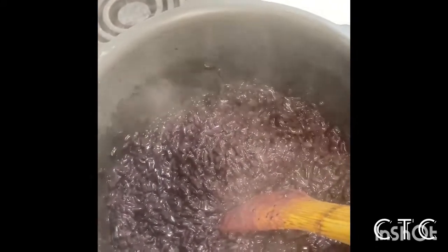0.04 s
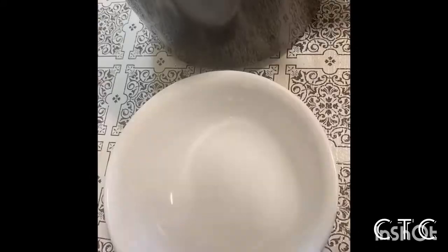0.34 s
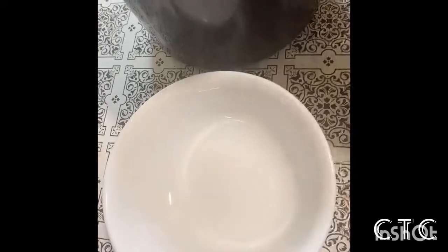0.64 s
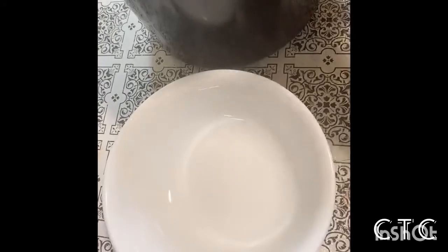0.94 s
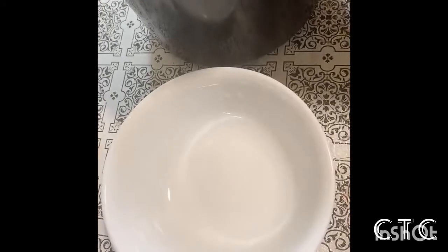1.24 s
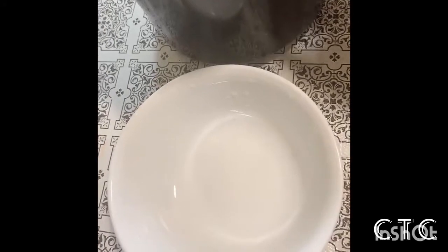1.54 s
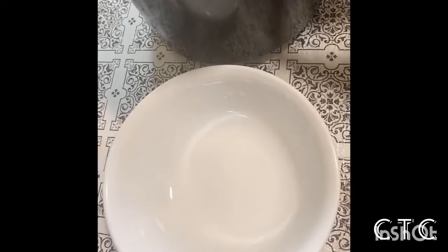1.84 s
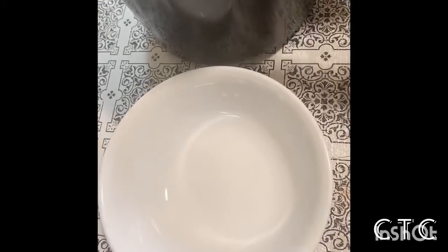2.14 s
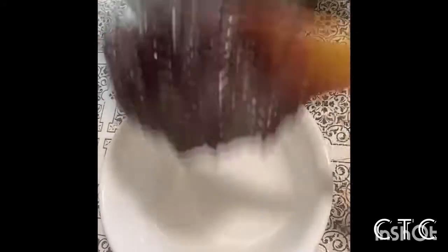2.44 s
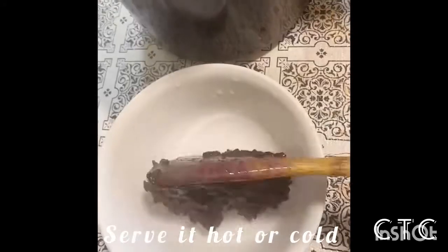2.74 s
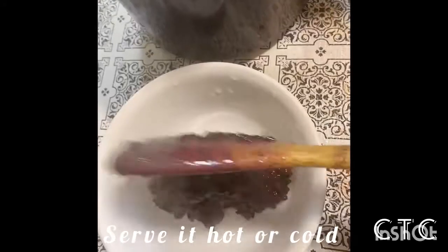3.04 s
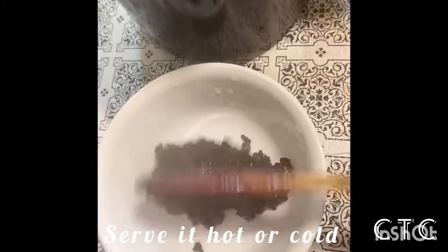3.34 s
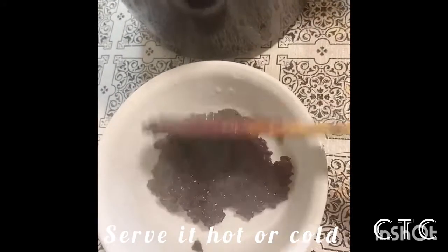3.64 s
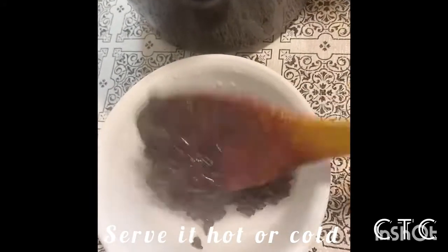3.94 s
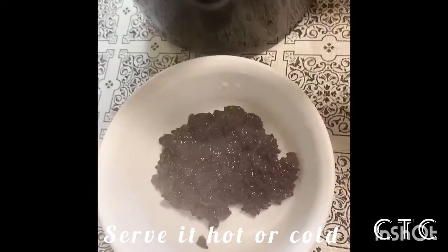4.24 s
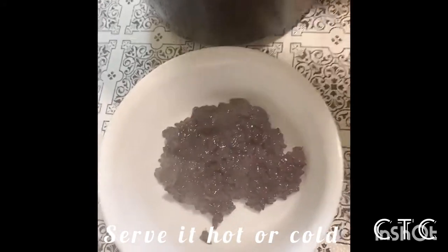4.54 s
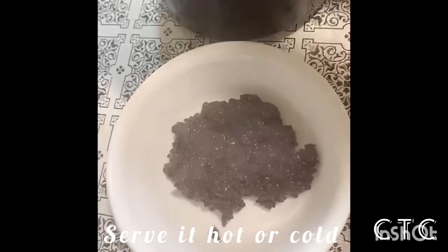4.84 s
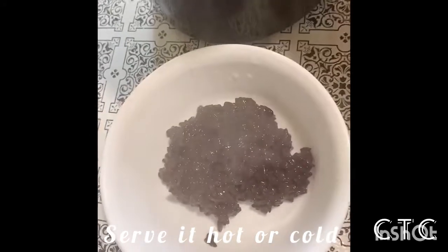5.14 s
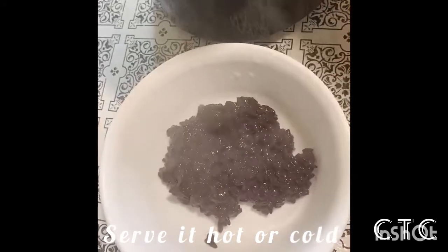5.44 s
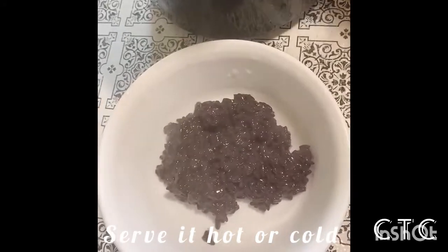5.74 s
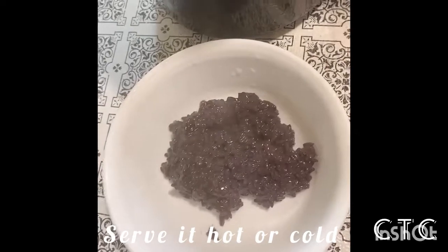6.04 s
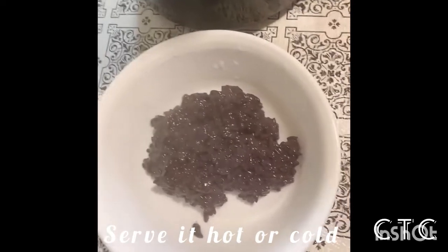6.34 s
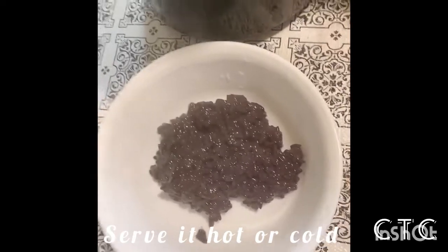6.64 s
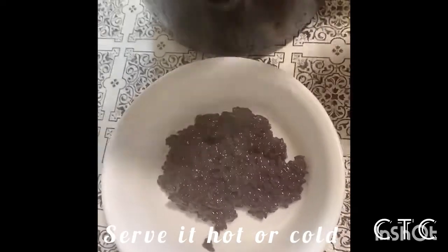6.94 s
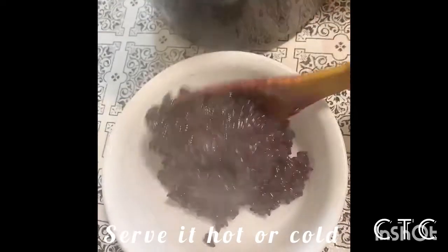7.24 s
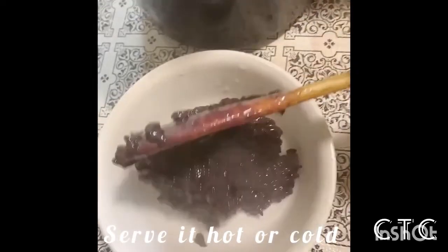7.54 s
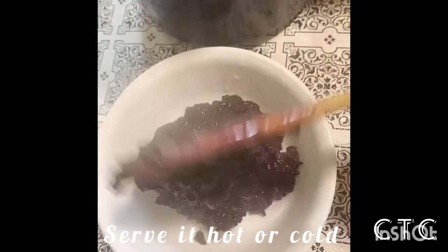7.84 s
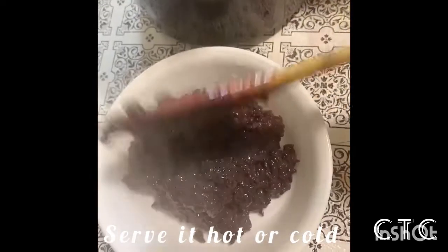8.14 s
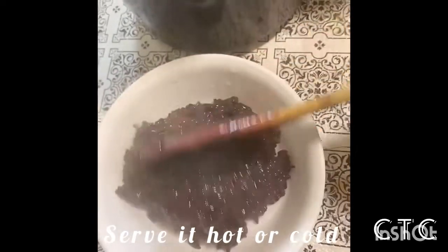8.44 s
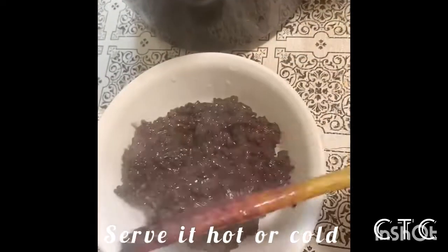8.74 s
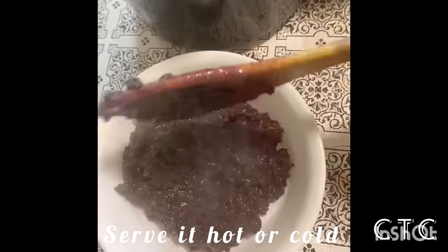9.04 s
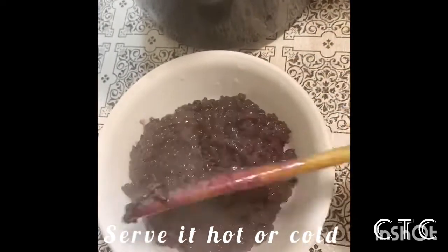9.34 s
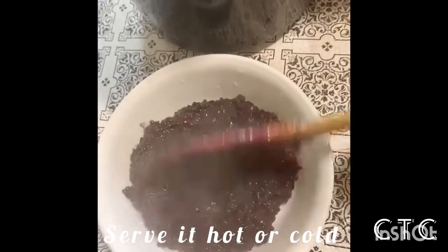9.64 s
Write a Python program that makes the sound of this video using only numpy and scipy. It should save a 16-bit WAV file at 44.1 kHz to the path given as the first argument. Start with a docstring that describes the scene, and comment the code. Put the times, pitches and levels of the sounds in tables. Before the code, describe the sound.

After a brief dropout and a dull spoon knock, a close microphone picks up sticky rice bubbling steadily in a small kitchen. Soft plops give way to wet spits and scattered knocks of a wooden spoon against the metal pot, which rocks slightly. The bubbling eases late on, then flares with a brighter knock. Underneath run a burner's hiss and a slowly pulsing electrical hum.

```python
"""In a small kitchen, thick rice simmers in a pot, heard through one close microphone.
Tiny bubbles crackle and larger ones gurgle and plop. Now and then a wet wooden spoon knocks
the pot, the pot rocks and the sticky rice squelches. Behind it a burner hisses and a motor
throbs slowly against the mains hum. The sound cuts out briefly just after the start."""
import sys
import numpy as np
from scipy import signal
from scipy.fft import rfft, irfft, next_fast_len
from scipy.io import wavfile
from scipy.ndimage import uniform_filter1d, map_coordinates

SR = 44100
rng = np.random.default_rng(int(sys.argv[2]) if len(sys.argv) > 2 else 0)


def inscribe(sig):
    """Save sig as 16-bit PCM at rate SR to the path in sys.argv[1].

    A 1-D sig is mono; a 2-D sig holds one channel per row.
    Samples are clipped to [-1, 1] before scaling.
    """
    pcm = np.round(np.clip(np.atleast_2d(sig).T, -1, 1) * 32767)
    wavfile.write(sys.argv[1], SR, pcm.astype(np.int16))


N = 432180

# How hard the rice boils; it builds, then sinks as the spoon lifts rice out: time_s, strength_db
BOIL_STRENGTH = [(.2, -39.5), (.6, -35), (.9, -38.5), (1.3, -34), (1.55, -37), (1.85, -32), (2.1, -38),
                 (2.6, -35.5), (2.9, -37.5), (3.4, -37.5), (3.8, -33), (4.15, -36), (4.5, -34), (5.15, -34),
                 (5.5, -32), (5.8, -35), (6.05, -32.5), (6.3, -37), (6.55, -30.5), (6.8, -35),
                 (7.05, -30.5), (7.35, -37), (7.65, -42), (8.1, -39), (8.65, -40.5), (9.35, -39.5),
                 (9.62, -28.5), (9.8, -34.5)]
# The tone colour of the tiny bubbles: pitch_hz, gain_db
CRACKLE_COLOUR = [(400, -21), (800, 1.5), (1200, -5), (1650, 0), (1900, -5), (2380, 3.5), (2600, -0.5),
                  (2880, -4.5), (3200, -1), (3700, -7.5), (4600, -3.5), (8000, -3.5), (11000, -23),
                  (14000, -24)]
# The notes at which the full pot rings: pitch_hz, width_hz, gain_db
POT_NOTES = [(195, 67, -10.5), (341, 93, -0.5), (425, 65, 1.5), (488, 79, -1.5), (600, 117, -5),
             (808, 117, -3), (1040, 210, -8.5), (1340, 240, -8), (1710, 220, -14.5), (1995, 120, -11.5),
             (2280, 140, -5.5), (2530, 240, -10), (2950, 200, -15), (4120, 490, -9.5), (5180, 400, -3.5),
             (6220, 2200, -6), (7430, 1660, -3), (9500, 3700, -13)]
def simmer(average_boil_db=-37, average_gurgle_db=-37.5, gurgle_follow=0.22):
    """Slow bubbles gurgle in the pot while tiny ones burst in clumps on top."""
    boil_db, = curves(BOIL_STRENGTH)
    gurgle_db = average_gurgle_db + gurgle_follow * (boil_db - average_boil_db)
    deep = bubbles(count=1800, low_hz=216, high_hz=635.4, fade_cycles=2.66, spread_db=1, samples=2000)
    gurgle = unit(room(resonate(deep, POT_NOTES), echo_db=-5))
    tiny = bubbles(count=11000, low_hz=660, high_hz=11030, fade_cycles=4.07, spread_db=3, samples=400)
    clumps = tiny * amp(1.1 * wobble(14))
    crackle = unit(room(coloured(clumps, CRACKLE_COLOUR), echo_db=9))
    return amp(gurgle_db) * gurgle + amp(boil_db - 1) * crackle


def bubbles(count, low_hz, high_hz, fade_cycles, spread_db, samples):
    """Bubbles ring at random times, each a short note that rises a little as it fades."""
    when, pitch, strength = rng.random((count, 3)).T[:, :, None]
    hz = low_hz * (high_hz / low_hz) ** pitch
    steps = np.arange(samples)
    cycles = hz * steps / SR
    age = cycles / fade_cycles
    tone = np.sin(2 * np.pi * cycles * (1 + np.minimum(age, 2) / 20))
    fade = np.exp(-age) * (1 - np.exp(-2 * cycles))
    gain = amp(-spread_db * np.log(1 - .97 * strength)) * hz / low_hz  # many weak, a few strong
    positions = (when * N).astype(int) + steps
    return np.bincount(positions.ravel(), (gain * tone * fade).ravel(), N)[:N]


# Large bubbles: start_s, pitch_hz, level_db, rise_s, glide_hz_per_s, froth_share (0 to 1)
BIG_BUBBLES = [(.778, 668, -29.5, 0.0138, 2800, 0.85), (.970, 932, -24.5, 0.0066, 800, 0.1),
               (1.175, 980, -35.5, .007, 1000, 1), (1.36, 940, -33, 0.016, 800, 0.93),
               (1.479, 792, -25, .0105, 3300, .8), (1.803, 782, -28, 0.014, 2200, 0.4),
               (2.205, 840, -33, 0.021, 500, 0.8), (4.766, 2490, -25, .0045, 1000, 0.4),
               (4.868, 2540, -29.5, .005, 1000, .45), (5.04, 1500, -34, 0.01, 1500, .7),
               (6.872, 1695, -32, 0.011, 2000, 0.8), (7.162, 1970, -32, .008, 2000, .8),
               (9.024, 1460, -31, .01, 2000, 0.8)]
def plops(froth_width=0.31):
    """A large bubble opens softly in froth, and its pitch climbs as it empties."""
    out, t = np.zeros(N), np.arange(SR // 4) / SR
    for start_s, pitch_hz, level_db, rise_s, glide, froth in BIG_BUBBLES:
        climbing_hz = pitch_hz + glide * (np.minimum(t, 5 * rise_s) - 2 * rise_s)
        phase = 2 * np.pi * np.cumsum(climbing_hz) / SR
        noise = rng.standard_normal(len(t))
        flutter = unit(filtered(noise, lambda hz: 1 / (1 + (2 * hz / (froth_width * pitch_hz)) ** 2)))
        tone = np.sin(phase) * (np.sqrt(1 - froth) + np.sqrt(froth) * flutter)
        add(out, start_s, amp(level_db) * room(swell(t, rise_s) * tone, echo_db=-10.5))
    return out


# The pot's four pitch ranges (thud, knock, ring, wet slap): low_hz, high_hz
POT_RANGES = [(150, 600), (600, 1800), (1800, 3300), (3300, 12500)]
# How each range answers a knock: gain_db, extra_db_per_hardness_db
RANGE_GAINS = [(-1, -0.55), (-3.5, -0.04), (-1.5, 0.88), (-4.5, .5)]
# Spoon knocks; hardness is low in deep rice and high on bare metal:
# start_s, rise_s, strength_db, hardness_db, clack_db, clack_hz, ring_db, echo_db
SPOON_KNOCKS = [(0.3073, 0.012, -20.8, -2.5, -1.5, 930, -16, -7.5),
                (.333, 0.0079, -29, -6, 1, 750, -20, -1.5), (3.971, 0.017, -31.5, -4, -3.5, 900, -11, -5),
                (4.735, .003, -40, -6, 4, 1370, -15, -9), (5.209, 0.01, -37, -14, -10, 800, -20, -4),
                (5.505, 0.017, -39, -7, -10, 900, -15, -3.5), (6.083, 0.014, -30, -9, -8, 800, -8, -1),
                (6.665, 0.013, -37, -8, -12, 1000, -15, -7), (6.981, 0.017, -41, 10, 0, 1450, 1, -6),
                (7.457, 0.017, -30, 6, -6.5, 720, 0.5, -6), (7.491, 0.007, -34.5, -7, -14, 800, -7, -10),
                (8.37, 0.0086, -47, -21, -12, 800, -20, -2), (9.546, 0.013, -26, 4, -4.5, 1100, 0, -5.5),
                (9.579, 0.0085, -34, 6.5, -1, 700, 1, -5)]
def spoon(clack_width_hz=760):
    """Rice cushions each knock, and harder ones sound brighter. Wood adds a clack, metal a ring."""
    out, t = np.zeros(N), np.arange(SR // 2) / SR
    for start_s, rise_s, strength_db, hardness_db, clack_db, clack_hz, ring_db, echo_db in SPOON_KNOCKS:
        force = room(tiny_slips(t, rise_s, grit=0.4), echo_db)
        knock = resonate(force, POT_NOTES)
        for edges_hz, (gain_db, extra) in zip(POT_RANGES, RANGE_GAINS):
            band = signal.butter(2, edges_hz, "band", fs=SR, output="sos")
            part = signal.sosfiltfilt(band, knock, padtype=None)
            add(out, start_s, at_level(part, strength_db + gain_db + extra * hardness_db))
        clack = rough_burst(t, rise_s, clack_hz, clack_width_hz, echo_db)
        add(out, start_s, at_level(clack, strength_db + clack_db))
        add(out, start_s, at_level(wall_ring(t, rise_s), strength_db + ring_db))
    return out


# The notes of the bare metal above the rice: pitch_hz, gain_db, fade_s (time to drop 60 dB)
WALL_NOTES = [(2023, -4, .27), (2205, -2, .18), (2320, -.5, .16), (2555, -2.5, .16), (3005, -2.5, .2),
              (4245, -11, .22), (4950, -13, 0.37), (5962, -18, .2)]
def wall_ring(t, rise_s, scatter_db=1.5, waver=0.5):
    """The pot wall rings a little differently at each knock; the shifting rice blurs its notes."""
    chance = rng.standard_normal((len(WALL_NOTES), 40))
    ring = 0
    for (hz, gain_db, fade_s), (level, phase, *drift) in zip(WALL_NOTES, chance):
        blur = waver * np.interp(t, np.linspace(0, t[-1], len(drift)), drift)
        fade = amp(gain_db + scatter_db * level - 60 * t / fade_s)
        ring += fade * np.sin(2 * np.pi * (hz * t + phase) + blur)
    return ring * (1 - np.exp(-(t / rise_s) ** 2))


# Thumps of the pot: start_s, rise_s, level_db
POT_THUMPS = [(3.97, .018, -36), (4.735, .018, -28), (6.66, .018, -36), (9.562, 0.021, -27)]
def rocking_pot(pitch_hz=76.4):
    """The pot rocks on the stove with a low thump."""
    out, t = np.zeros(N), np.arange(SR // 2) / SR
    for start_s, rise_s, level_db in POT_THUMPS:
        add(out, start_s, amp(level_db) * swell(t, rise_s) * np.sin(2 * np.pi * pitch_hz * t))
    return out


# Wet spits from the rice: start_s, rise_s, pitch_hz, width_hz, level_db
RICE_SPITS = [(1.879, .01, 8850, 1300, -34), (1.871, 0.018, 4200, 5000, -36), (2.52, .015, 7500, 3500, -39),
              (2.598, 0.0092, 8750, 1500, -34), (2.605, 0.018, 1600, 3500, -33.5),
              (2.672, 0.011, 1400, 1000, -39), (2.738, .012, 2300, 700, -39),
              (3.033, .013, 2250, 1100, -38), (3.21, 0.017, 850, 700, -41), (3.37, .02, 2300, 1800, -37),
              (4.29, 0.015, 2300, 1500, -37), (4.63, 0.011, 2350, 800, -40), (5.36, .013, 5500, 4000, -36),
              (6.455, 0.017, 1700, 1900, -35), (6.675, 0.02, 5500, 4500, -31.5),
              (7.858, .011, 1440, 800, -36), (8.61, 0.013, 890, 500, -44), (8.68, 0.016, 3300, 2000, -35.5)]
def squelches():
    """Sticky rice pulls apart and spits steam, each spit around its own pitch."""
    out, t = np.zeros(N), np.arange(SR // 3) / SR
    for start_s, rise_s, pitch_hz, width_hz, level_db in RICE_SPITS:
        spit = rough_burst(t, rise_s, pitch_hz, width_hz, echo_db=-2.5)
        add(out, start_s, at_level(spit, level_db))
    return out


# The tone colours of the burner's roar and hiss: pitch_hz, gain_db
ROAR_COLOUR = [(20, -14.5), (45, -7), (80, -5.5), (110, -1), (170, -5.5), (260, -2), (350, -0.5), (490, -3),
               (570, -8), (850, -10.5), (1150, -12.5), (2300, -15), (3500, -17), (6000, -40)]
HISS_COLOUR = [(900, -11.5), (2000, -3), (3100, 0), (3700, -7), (4300, 3), (4850, 2.5), (5500, -0.5),
               (8000, 2), (10000, 1), (11000, 1), (12500, -4.5), (13500, -12), (15000, -11.5), (16000, -18)]
# Thin whistles of the burner jets: pitch_hz, width_hz, gain_db
JET_WHISTLES = [(2340, 90, -5), (4800, 85, 2), (8100, 60, -9.5), (10450, 60, -2.5), (10820, 63, -4.5)]
# How the steam swells and sinks: time_s, strength_db
STEAM_STRENGTH = [(.2, -36), (.6, -35), (.9, -37.5), (1.3, -35.5), (1.5, -35.5), (1.85, -35), (2.1, -36),
                  (2.6, -33.5), (2.9, -35.3), (3.15, -33), (3.5, -35), (3.7, -34), (4.15, -35),
                  (4.32, -34.5), (4.7, -35), (5.15, -35.2), (5.38, -33.5), (5.62, -34), (5.8, -35),
                  (6.13, -33.7), (6.29, -36), (6.48, -34.5), (6.62, -34.5), (6.95, -33), (7.3, -34.5),
                  (7.65, -35), (8.1, -35), (8.3, -35.8), (8.67, -34.5), (8.85, -35), (9.4, -35.5),
                  (9.62, -33.5), (9.8, -34.5)]
def burner(roar_db=-35, hiss_boost_db=0.97, jets_db=-45.5):
    """The burner roars softly, its jets whistle, and a bright hiss swells with the steam."""
    steam_db, = curves(STEAM_STRENGTH)
    roar_noise, hiss_noise, jet_noise = rng.standard_normal((3, N))
    hiss_db = steam_db + hiss_boost_db + 0.76 * wobble(13)
    hiss = close_echoes(coloured(hiss_noise, HISS_COLOUR), echo_db=-18)
    roar = coloured(roar_noise, ROAR_COLOUR)
    whistles = unit(resonate(jet_noise, JET_WHISTLES))
    return amp(roar_db) * roar + amp(hiss_db) * hiss + amp(jets_db) * whistles


# Steady tones of the kitchen: pitch_hz, level_db
KITCHEN_TONES = [(58.3, -59), (92.1, -47), (245.2, -53), (490.4, -45.5), (602, -55.5), (840, -56)]
# How fast the motor throbs against the mains hum: time_s, throb_hz
THROB_RATE = [(0, 2.8), (1.7, 2.85), (2.3, 2.48), (6, 2.5), (7.5, 2.38), (9.8, 2.5)]
def motor_hum(motor_hz=122.6, motor_db=-32, mains_db=-43, in_step_s=0.59):
    """A motor drones just off the pitch of the mains hum, so together they grow and fade in turn."""
    t = np.arange(N) / SR
    phase = 2 * np.pi * motor_hz * t + .06 * wobble(3.2)
    throbs = np.cumsum(curves(THROB_RATE)[0]) / SR
    lag = 2 * np.pi * (throbs - np.interp(in_step_s, t, throbs))
    tones = sum(amp(db) * np.sin(2 * np.pi * hz * t + hz / 500 * wobble(5)) for hz, db in KITCHEN_TONES)
    return np.sqrt(2) * (amp(motor_db) * np.sin(phase) + amp(mains_db) * np.sin(phase - lag) + tones)


# How long the kitchen echoes: pitch_hz, fade_s (time to drop 60 dB)
KITCHEN_ECHO = [(100, 0.45), (500, 0.46), (2500, 0.16), (10000, 0.17)]
def room(x, echo_db):
    """The kitchen walls add a fading echo; the overall level stays about the same."""
    hz, t, noise = signal.stft(rng.standard_normal(SR // 2), SR, nperseg=256)
    fade = amp(-60 * t / along(KITCHEN_ECHO, hz)[:, None])
    tail = signal.istft(noise * fade, SR, nperseg=256)[1]
    echo = signal.fftconvolve(x, tail / np.linalg.norm(tail))[:len(x)]
    return (x + amp(echo_db) * echo) / np.hypot(1, amp(echo_db))


def close_echoes(x, echo_db, count=10, spread_s=.014):
    """Quick echoes off the pot, stove and wall put fine ripples in the tone colour."""
    delays_s = spread_s * (.15 + rng.random(count))
    gains = amp(echo_db) * unit(rng.standard_normal(count))
    return unit(x + sum(gain * np.roll(x, int(SR * s)) for s, gain in zip(delays_s, gains)))


def tiny_slips(t, rise_s, grit):
    """A cushioned touch is a quick swell of tiny slips; more grit makes them more uneven."""
    force, size = rng.standard_normal((2, len(t)))
    return force * np.exp(grit * size) * swell(t, rise_s)


def rough_burst(t, rise_s, pitch_hz, width_hz, echo_db):
    """Gritty slips and their echo, narrowed twice around one pitch."""
    note = [(pitch_hz, width_hz, 0)]
    slips = room(tiny_slips(t, rise_s, grit=0.72), echo_db)
    return resonate(resonate(slips, note), note)


def amp(db):
    """Turn decibels into a gain."""
    return 10 ** (np.asarray(db) / 20)


def unit(x):
    """Scale to an average (rms) level of 1."""
    return x / np.sqrt(np.mean(x ** 2) + 1e-20)


def at_level(x, level_db):
    """Scale a sound so that its first 50 ms have this level."""
    return amp(level_db) * x / np.std(x[:SR // 20])


def along(points, hz):
    """Read between (pitch_hz, value) points, with octaves evenly spaced."""
    pitches, values = np.transpose(points)
    return np.interp(np.log(hz + 1), np.log(pitches + 1), values)


def curves(rows):
    """One value per sample for each column after the time."""
    times, *columns = np.transpose(rows)
    return [np.interp(np.arange(N) / SR, times, column) for column in columns]


def wobble(rate_hz):
    """A smooth curve through rate_hz random values a second."""
    points = rng.standard_normal(int(N * rate_hz / SR) + 4)
    return map_coordinates(points, [np.arange(N) * rate_hz / SR])


def filtered(x, response):
    """Scale each frequency in x by response(hz)."""
    size = next_fast_len(len(x) + 8192)
    return irfft(rfft(x, size) * response(np.fft.rfftfreq(size, 1 / SR)), size)[:len(x)]


def coloured(x, colour):
    """Give x a (pitch_hz, gain_db) tone colour, at an average level of 1."""
    return unit(filtered(x, lambda hz: amp(along(colour, hz))))


def resonate(x, notes):
    """Let x ring at each (pitch_hz, width_hz, gain_db) note."""
    return filtered(x, lambda hz: sum(
        (-1) ** k * amp(db) * 1j * hz * width / (pitch ** 2 - hz ** 2 + 1j * hz * width)
        for k, (pitch, width, db) in enumerate(notes)))


def add(track, start_s, sound):
    """Mix a sound into the track at start_s."""
    part = track[max(0, round(start_s * SR)):][:len(sound)]
    part += sound[:len(part)]


def swell(t, rise_s):
    """A loudness shape that reaches 1 after rise_s and dies away."""
    return t / rise_s * np.exp(1 - t / rise_s)


def scene():
    """Everything reaches one microphone, heard alike in both ears."""
    mono = simmer() + plops() + spoon() + rocking_pot() + squelches() + burner() + motor_hum()
    return np.array([mono, mono])


# The brief silence: start_s, end_s
SILENT_GAP = (.023, .164)
def record(dry, top_hz=15900):
    """The sound cuts out for a moment, and the treble above top_hz is removed."""
    t = np.arange(N) / SR
    sound_on = (t < SILENT_GAP[0]) | (t > SILENT_GAP[1])
    gain = uniform_filter1d(1. * sound_on, size=40)  # soften the edges of the gap
    return np.array([filtered(channel * gain, lambda hz: 1 / (1 + (hz / top_hz) ** 200))
                     for channel in dry])


dry = scene()
out = record(dry)
inscribe(out)
```